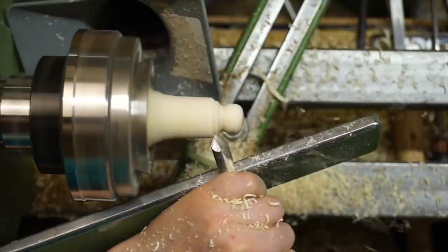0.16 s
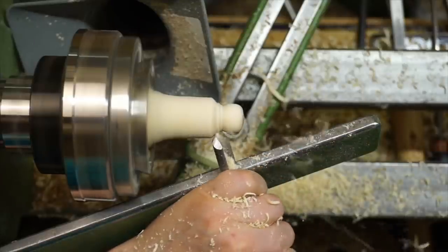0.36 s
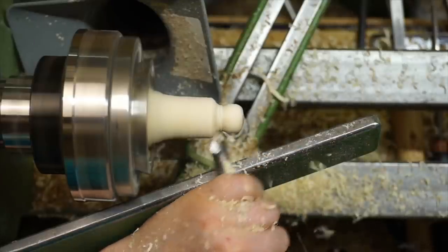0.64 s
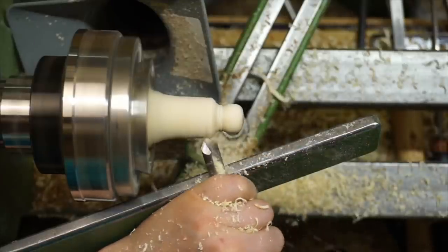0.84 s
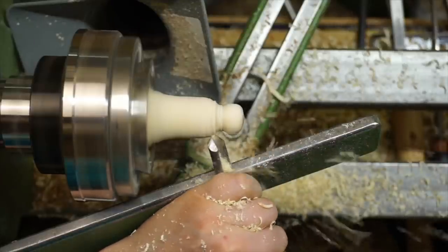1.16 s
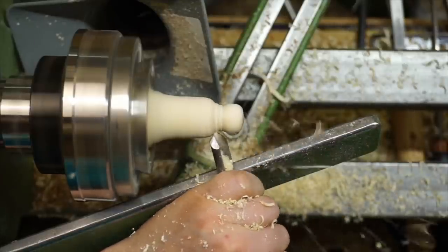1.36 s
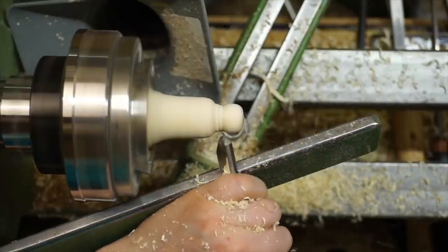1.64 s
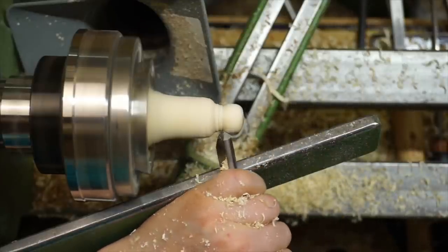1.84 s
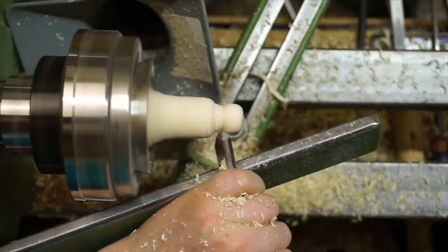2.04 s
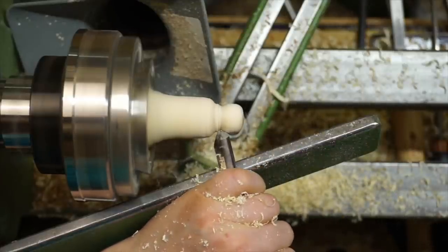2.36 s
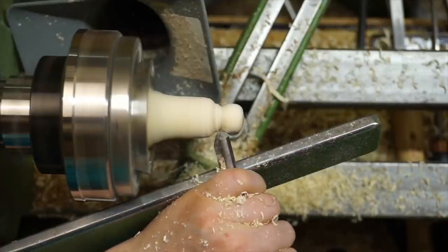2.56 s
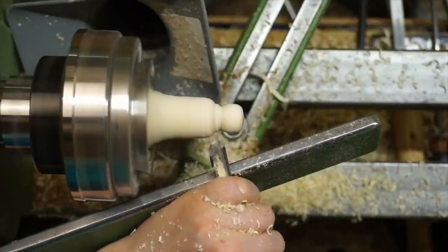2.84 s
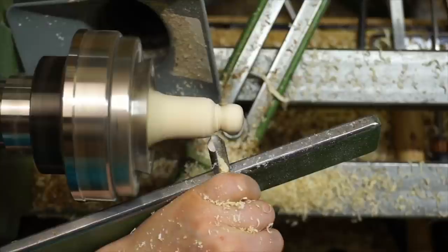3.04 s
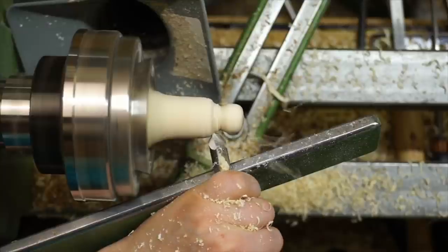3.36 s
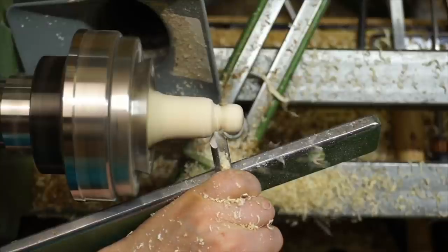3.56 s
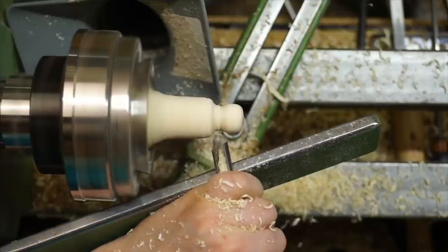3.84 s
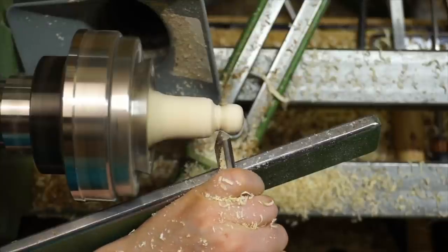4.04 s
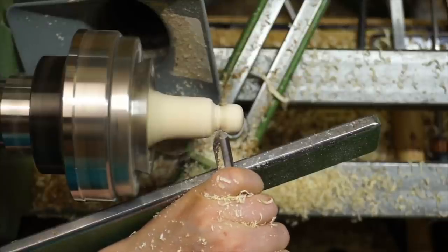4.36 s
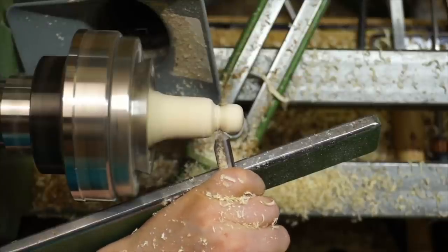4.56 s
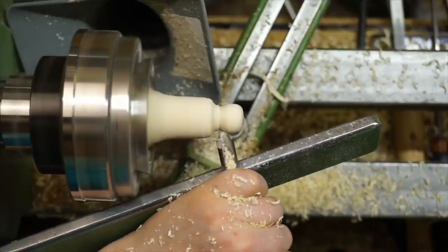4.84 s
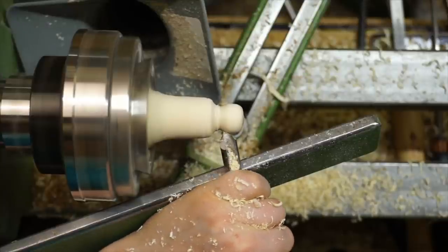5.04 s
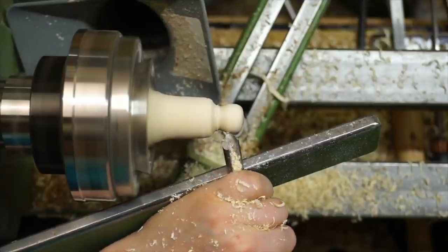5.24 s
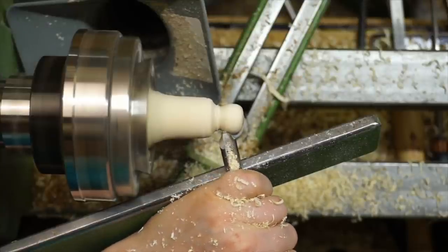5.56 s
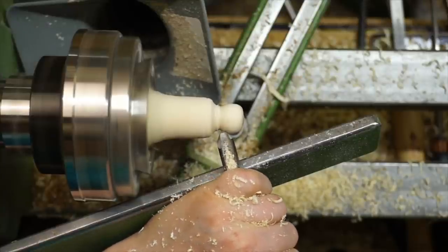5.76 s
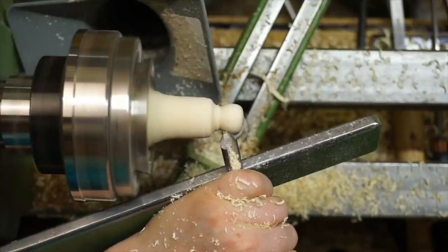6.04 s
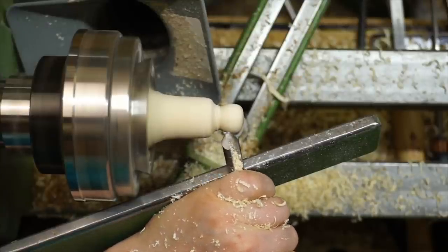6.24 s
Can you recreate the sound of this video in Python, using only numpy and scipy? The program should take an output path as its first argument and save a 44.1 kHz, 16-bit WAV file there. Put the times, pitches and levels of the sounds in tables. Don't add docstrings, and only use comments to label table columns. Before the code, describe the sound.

A lathe hums, whines and rushes throughout in a small workshop. Close to a small, bass-light microphone, a chisel scrapes spinning wood: two raspy, knocking cuts with a quick tap between, three brighter, ringing cuts, then three lighter, thinner skims. Each squeals around a high pitch with fast fluttering chatter, and only the motor is heard in the gaps.

```python
import sys
import numpy as np
from scipy import signal
from scipy.io import wavfile
from scipy.ndimage import uniform_filter1d

SR = 44100
rng = np.random.default_rng(int(sys.argv[2]) if len(sys.argv) > 2 else 0)


def dump(signal):
    limited = np.clip(np.atleast_2d(signal).T, -1, 1)
    pcm = np.round(limited * 32767).astype(np.int16)
    wavfile.write(sys.argv[1], SR, pcm)


def ratio(d):
    e = np.asarray(d, float) / 20
    return 10 ** e


N = 282636
TURN_HZ = 42.38

# bite in seconds, leave in seconds, time to sink in
# in seconds, level while rubbing in dB, where on the turn the blank stands proud from 0 to 1.
EDGE = [
    (-.02, 0.552, .01, -18, 0.47),
    (0.662, .685, .006, -18, .49),
    (0.718, 1.423, 0.082, -9.5, 0.38),
    (1.889, 2.63, 0.014, -22, 0.41),
    (3.064, 3.699, 0.027, -9.5, 0.36),
    (4.136, 4.496, 0.011, -18, .44),
    (4.922, 5.113, 0.011, -8.5, 0.48),
    (5.226, 5.777, 0.012, -25, 0.02),
    (5.928, 6.45, 0.022, -11, 0.03),
]


def evened(x):
    return x / np.sqrt(np.mean(x ** 2) + 1e-20)


def lumpy(x, size):
    return evened(uniform_filter1d(uniform_filter1d(x, size=size), size=size))


def patchy(shape, bins, frames):
    noise = rng.standard_normal(shape)
    return evened(uniform_filter1d(uniform_filter1d(noise, size=bins, axis=0), size=frames, axis=1))


def capped(x, limit):
    swing = np.sqrt(2 * abs(uniform_filter1d(x ** 2, size=37))) / limit + 1e-9
    return x * np.tanh(swing) / swing


def colour_db(points, peaks, hz):
    f, db = np.transpose(points)
    bumps = sum(up_db / (1 + (2 * (hz - at_hz) / width) ** 2) for at_hz, width, up_db in peaks)
    return np.interp(np.log(hz + 1), np.log(f + 1), db) + bumps


def response(db):
    log_gain = np.maximum(db - db.max(), -90) * np.log(10) / 20
    circle = np.concatenate([log_gain, log_gain[-2:0:-1]])
    h = np.fft.ifft(np.exp(np.conj(signal.hilbert(circle)))).real[:len(db) // 2]
    return h / np.linalg.norm(h)


def resonate(x, hz, width):
    turn = np.exp(2j * np.pi * np.cumsum(hz * np.ones(len(x))) / SR)
    r = np.exp(-np.pi * width / SR)
    return np.sqrt(2 * (1 - r * r)) * (turn * signal.lfilter([1], [1, -r], x / turn)).real


def ring(x, hz, width):
    return resonate(resonate(x, hz, width), hz, width) * np.sqrt(2 * np.pi * width / SR)


def add(mix, s, sound):
    part = mix[round(s * SR):][:len(sound)]
    part += sound[:len(part)]


def run(turns):
    count = round(turns)
    return [(k / TURN_HZ, ((2 * k + 1 - count) / count) ** 2) for k in range(count)]


def lathe():
    # pitch in Hz, density in dB per Hz.
    rush = [(65, -90), (110, -46.5), (272, -17.5), (363, -10), (424, -8), (485, -7.5), (934, -4.5),
            (1370, -14.5), (1980, -3.5), (2540, -15.5), (3460, -17.5), (6170, -40.5), (8400, -30.5),
            (11000, -67), (14300, -99), (22000, -120)]
    # pitch in Hz, width in Hz, level above the rush in dB.
    housing = [(172.6, 16, 10.4), (213, 8, 7.7), (277.4, 7.5, 10.8), (342.6, 7.8, 8), (384, 5.8, 4.2),
               (604, 20, 6.6), (678, 15, 6.7), (850.6, 19, 8.2), (884, 40, 2.5), (2051, 93, 11.15),
               (3005, 44, 7.6), (3260, 61, 7.6), (3620, 59, 7.1), (5820, 110, 15), (7200, 42, 3.6),
               (8100, 50, 4.7), (8300, 38, 14), (9000, 45, 5), (9100, 530, 7.3), (2730, 30, 10)]
    # pitch in Hz, width in Hz, level in dB rms.
    whines = [(277.7, 6.7, -64.5), (424.4, 8.3, -56), (927, 18, -53), (1155, 27, -58), (1915, 26, -48.5),
              (1976, 23, -47.5), (2050, 44, -51.5)]
    # start in seconds, length in seconds, pitch in Hz, width in Hz, level in dB rms.
    shudders = [
        (1.075, 0.12, 337, 80, -50),
        (2.533, 0.2, 155, 25, -63.5),
        (3.513, 0.227, 367, 88, -46),
    ]
    rush_db, load_db, load_s, creep_db_per_s = -49, 2.08, 0.39, 0.29
    whine_break_db = 3

    t, hz = np.arange(N) / SR, np.fft.rfftfreq(2048, 1 / SR)
    shape = (len(hz), N // 512 + 5)
    noise = rng.standard_normal(shape) + 1j * rng.standard_normal(shape)
    z = noise * ratio(colour_db(rush, housing, hz)[:, None] + 1.77 * patchy(shape, 10, 10))
    out = evened(signal.istft(z, nperseg=2048, noverlap=1536)[1][:N])
    load = uniform_filter1d(hand()[0], round(load_s * SR))
    out *= ratio(rush_db + load_db * load + creep_db_per_s * t + 4.5)

    broken = lumpy(rng.standard_normal(N), 1500) - 1
    for line_hz, width, db in whines:
        out += ratio(db + whine_break_db * broken) * ring(rng.standard_normal(N), line_hz, width)
    for s, length, low_hz, width, db in shudders:
        swell = np.sin(np.pi * np.clip((t - s) / length, 0, 1))
        rumble = resonate(resonate(rng.standard_normal(N), low_hz, width), low_hz, width)
        out += ratio(db) * swell * evened(rumble)
    return out


def hand():
    # time in seconds, pressure as dB of the song,
    # depth of cut as dB of the blank against the song.
    flat_cuts = [
        [(0, -22.5, -5.5), (.058, -19, 0), (.1, -19.5, -4.5), (.412, -19.5, -5.5), (.546, -21, -4),
         (.576, -21, -13), (.612, -41, -16), (.64, -35, -19)],
        [(.725, -50, -8), (.737, -26.5, -16), (.813, -20.5, -13), (.905, -19.5, -12.5), (1.017, -16, -2.5),
         (1.29, -21, -4.5), (1.453, -20, -18), (1.511, -29, -16), (1.56, -73, -7)],
    ]
    tap = [
        (0.662, -35, -21),
        (0.676, -20.5, -32),
        (0.69, -35, -16),
        (0.71, -53, -14),
    ]
    tipped_cuts = [
        [(1.81, -66, -5), (1.842, -26, -34), (1.884, -35, -10), (1.91, -19, -14.5), (2.12, -22, -16),
         (2.278, -17, -19), (2.428, -22, -16), (2.59, -19.5, -15), (2.69, -46.5, -6)],
        [(2.96, -48, -10), (3.012, -25, -19), (3.058, -28, -12), (3.104, -24, -15.5), (3.376, -25, -15.5),
         (3.428, -16, -21), (3.52, -16.5, -5.5), (3.72, -20, -15.5), (3.77, -54, -14)],
        [(4.05, -70, 4), (4.068, -38.5, -15), (4.126, -38, -9), (4.138, -28, -6), (4.16, -18, -21),
         (4.3, -21, -12), (4.472, -20.5, -6.5), (4.536, -40, -28), (4.57, -70, -3)],
    ]
    skimming_cuts = [
        [(4.81, -83, 12), (4.826, -31.5, -16), (4.912, -47, 1), (4.922, -29, -16), (5.06, -33, -18),
         (5.088, -25, -23), (5.104, -41, 6), (5.112, -35, -7), (5.17, -61, 4)],
        [(5.22, -59, -5), (5.242, -25, -12), (5.39, -22.5, -25), (5.402, -19.5, -35), (5.424, -18, -26),
         (5.712, -29, -15), (5.72, -24, -19), (5.84, -44, -9), (5.85, -38, -11)],
        [(5.89, -47, 1), (5.932, -30.5, -5), (6.108, -27, -18), (6.236, -31.5, -12), (6.246, -13, -47),
         (6.252, -18.5, -29), (6.306, -21.5, -27), (6.346, -18.5, -28), (6.409, -27, -18)],
    ]
    # blade against the song in dB, its growth in dB per second,
    # hiss in dB, its growth in dB per second.
    tearing = [(-5, -9, -48, -2), (-18.5, .1, -64, .1), (-5, -6, -45, -10.5), (-17, 21.5, -55, 6.5),
               (-10, -4, -53, -2), (-8.5, -14.5, -51, -24), (-24.5, 30, -49, 18), (-13, -18, -43.5, -19),
               (-19.5, 15, -47.5, 12)]
    upper_by_cut_db = [-8.5, -2, -7.5, -8, -7, -8.5, -2, -2.5, -2]
    firm_db, usual_depth_db = -22, -4.5
    song_base_hz, sag_hz_per_db, sag_hz_per_depth, rub_rise_hz = 2391, 2, 1.35, 119
    blade_follows, blade_per_depth, rub_upper_db = 0.85, 0.2, 6
    hiss_follows, hiss_knee_db, hiss_dies = 0.44, -42, 0.61
    leave_s, left_blade_db, left_hiss_db = 0.047, -11, -17
    grows_for_s = 0.47

    cuts = [flat_cuts[0], tap, flat_cuts[1], *tipped_cuts, *skimming_cuts]
    t = np.arange(N) / SR
    cut = np.clip(np.searchsorted([rows[0][0] for rows in cuts], t, side="right") - 1, 0, None)
    start, end = np.array([(rows[0][0], rows[-1][0]) for rows in cuts])[cut].T
    touch = uniform_filter1d(1. * (t >= start) * (t <= end), size=300, mode="nearest")
    s, pressure, depth = np.concatenate(cuts).T
    pressure, depth = np.interp(t, s, pressure), np.interp(t, s, depth)

    bite, leave, sink, rub_db = np.array(EDGE)[cut, :4].T
    rubbing = np.clip(1 - (t - bite) / sink, 0, 1)
    left = np.clip((t - leave) / leave_s, 0, 1)
    cutting = np.maximum(t - bite, 0)
    harder, deeper = pressure - firm_db, depth - usual_depth_db

    song_hz = song_base_hz - sag_hz_per_db * np.maximum(harder, -20) - sag_hz_per_depth * deeper
    song_hz += rub_rise_hz * rubbing
    blade_db, blade_grows, hiss_db, hiss_grows = np.array(tearing)[cut].T
    blade_db = (firm_db + blade_follows * harder + blade_db + blade_grows * np.minimum(cutting, grows_for_s)
                + blade_per_depth * deeper + rub_db * rubbing + left_blade_db * left)
    upper_db = blade_db + np.array(upper_by_cut_db)[cut] + rub_upper_db * rubbing
    hiss_db = (hiss_db + hiss_grows * cutting + hiss_follows * harder
               + hiss_dies * np.minimum(pressure - hiss_knee_db, 0) + rub_db * rubbing + left_hiss_db * left)
    song_db, blank_db = pressure - 1.5, pressure + depth + 1.1
    return touch, cut, [song_hz, song_db, blank_db, blade_db, upper_db, hiss_db]


def surface(kept):
    step = round(SR / TURN_HZ)
    fresh = rng.standard_normal((N // step + 1, step))
    wood = fresh.copy()
    for k in range(1, len(wood)):
        share = kept[min(k * step, N - 1)]
        wood[k] = share * wood[k - 1] + np.sqrt(1 - share ** 2) * fresh[k]
    return wood.ravel()[:N]


def bites(cut, kept, uneven_db, throb_db):
    end_grain_turn = .13
    turned = TURN_HZ * np.arange(N) / SR
    lumps = lumpy(surface(np.maximum(kept, .88)), 150)
    end_grain = np.cos(4 * np.pi * (turned - end_grain_turn))
    off_centre = np.cos(2 * np.pi * (turned - np.array(EDGE)[cut, -1]))
    bite_db = uneven_db * lumps + throb_db * (end_grain + 0.52 * off_centre)
    firm = ratio(1.5 * bite_db)
    soft = ratio(1.05 * (bite_db - .3 * throb_db * end_grain) + .7 * lumps)
    return [g / np.sqrt(uniform_filter1d(g ** 2, size=4000)) for g in (firm, soft)]


def rasp(tear, grips, skirt_db, blank_db, blade_db, upper_db, hiss_db):
    # pitch in Hz, density in
    # dB per Hz.
    flat = [
        [(530, -78), (900, -35.5), (1140, -21.5), (1440, -25), (1940, -9), (2410, 1.5), (3000, -10.5), (3750, -9), (5070, -19.5), (6290, -19.5), (7900, -26), (8500, -36), (11000, -80), (18700, -120)],
        [(5000, -45), (8500, -10), (8800, -14), (9300, -3), (11000, -6), (11700, -12), (12800, -8), (13700, -27), (15100, -22), (15800, -25)],
    ]
    tipped = [
        [(530, -52), (900, -43), (1170, -23.5), (1410, -34), (1790, -19), (2410, 0.5), (3000, -13), (3820, -12), (4570, -19), (7670, -29), (8500, -44), (11000, -84), (18700, -120)],
        [(5000, -51), (8500, -29), (8840, -31), (9240, 0), (9730, 6), (12800, -7), (13600, -28), (15000, -6), (15800, -15)],
    ]
    skimming = [
        [(530, -46), (900, -25.5), (1240, -34.5), (1820, -38), (2140, -20.5), (2410, 10.5), (3000, -16), (3720, -21), (4490, -25), (6230, -27), (8500, -35), (11000, -87), (18700, -120)],
        [(5000, -56), (8500, -52), (8700, -46), (9140, -5.5), (9730, 2), (11500, -13.5), (13500, -20), (14600, -19), (15800, -29)],
    ]
    # pitch in Hz, width in Hz, level above the colour in dB.
    rings = [(1161.4, 13.4, 11), (1956, 66, 4.5), (2160, 150, -2.5), (2654, 15, 10.5), (2840, 22, 6),
             (3183, 47, 15.5), (3146, 57, -13), (3640, 30, 11), (3845, 96, 6), (4260, 145, 4.5),
             (4850, 87, 7), (5366, 68, 7.5), (6167, 120, 9.5), (7120, 110, 8), (7650, 280, 8.5),
             (9250, 570, 4.5), (9720, 620, -4), (13000, 160, -3), (13500, 370, -4), (15450, 250, 5)]
    # level, low Hz, high Hz, side of the notch
    bands = [(skirt_db, 2150, 3000, 0), (blank_db, 950, 2150, 0), (blade_db, 3000, 4600, 0),
             (upper_db, 4600, 8500, 0), (hiss_db, 8500, 15800, 1)]
    hz, out = np.fft.rfftfreq(8192, 1 / SR), np.zeros(N)
    for name, colours in (("flat", flat), ("tipped", tipped), ("skimming", skimming)):
        held = grips == name
        for db, low_hz, high_hz, side in bands:
            octaves_out = np.maximum(np.log2(np.maximum(low_hz / (hz + 1), hz / high_hz)), 0)
            h = response(colour_db(colours[side], rings, hz) - 150 * octaves_out)
            out += signal.oaconvolve(tear * ratio(db) * held, h)[:N]
    return out


def shifting(x, patchy_db):
    z = signal.stft(x, nperseg=512)[2]
    return signal.istft(z * evened(ratio(patchy_db * patchy(z.shape, 4, 28))), nperseg=512)[1][:N]


def pings():
    # start in seconds, peak level in dB, pitch in Hz.
    blank_knocks = [(0.0149, -31, 1290), (0.0453, -27, 1170), (0.1037, -31, 1150), (0.1565, -30, 1310),
                    (0.2633, -32, 1320), (0.3676, -25, 1170), (0.4209, -28, 1090), (0.9477, -28, 1170),
                    (1.0031, -25, 1220), (1.0335, -22, 1300), (1.1458, -29, 1090), (1.3114, -31, 1170),
                    (3.5872, -30, 1180), (4.2837, -37, 1180)]
    # start in seconds, number of turns, peak level in dB, pitch in Hz.
    struck = [(.673, 1, -35, 8400), (0.75, 1, -36, 7600), (0.47, 1, -44, 7500), (0.8, 1, -50, 7600),
              (1.851, 2, -23, 2780), (1.9, 4, -22, 2400), (2.014, 1, -33, 3770), (1.9, 2, -28, 3815),
              (2.233, 9, -22, 3830), (2.446, 8, -20.5, 3868), (2.6, 3, -29, 4270), (2.53, 4, -28, 4290),
              (3.101, 8, -37, 7590), (3.289, 7, -36, 7570), (3.112, 2, -42, 7450), (3.099, 5, -50, 9000),
              (3.24, 9.3, -40, 9620), (3.1, 3, -38, 3720), (3.221, 2, -37, 3750), (3.415, 1, -29, 3660),
              (3.447, 1, -30, 3400), (3.506, 3, -21, 3100), (3.61, 1, -25, 3400), (3.46, 5, -19.5, 3190),
              (4.277, 4, -24, 3830), (4.377, 4, -24, 3850), (4.388, 3, -29, 3850), (4.827, 4, -48, 10300),
              (4.919, 1, -48, 10250), (4.94, 6, -37, 9440), (4.968, 8, -45, 10220), (4.92, 1, -41, 4700),
              (4.99, 2, -46, 5700), (4.5, 2, -45, 4100), (5.251, 4, -38.5, 10030), (6.019, 2, -42, 6130),
              (6.089, 8, -38, 5500), (6.042, 10, -44, 4080), (5.997, 1, -46, 6300), (6.042, 3, -44, 5260),
              (6.184, 2, -40, 4850), (5.5, 1, -36, 4400), (6.29, 1, -32, 3420), (6.303, 4, -29, 3780),
              (6.315, 2, -30, 3400), (5.6, 4, -38, 9470), (6.324, 2, -37, 5000), (5.1, 1, -34, 6230),
              (2.245, 8, -28, 3840), (2.434, 9, -27, 3870), (2.642, 2, -33, 3860),
                    (2.655, 2, -36, 3860), (.035, 3, -33, 7800), (.152, 3, -30, 6150), (.36, 2, -31, 6150),
                    (.46, 2, -32, 6150), (.486, 4, -42, 9600), (.345, 3, -44, 11000), (4.07, 1, -56, 10600),
                    (4.185, 3, -42, 9500), (5.565, 2, -45, 9580), (5.676, 3, -45, 10200),
                    (5.946, 2, -46, 10140), (5.958, 1, -44, 9980)]
    knock_rise_s = .008
    ping_s, ping_hz, ends_db, uneven_db = .013, 3793, -3, 4

    out = np.zeros(N)
    knocks = [(s + knock_rise_s, 1, db, hz) for s, db, hz in blank_knocks]
    for s, turns, peak_db, hz in struck + knocks:
        length = ping_s * (ping_hz / hz) ** .6
        t = np.arange(round(length * SR)) / SR
        bump = np.sin(np.pi * (t / length) ** .7) ** 2
        twin_gain = .45 * np.clip(hz / ping_hz - 1, 0, 1)
        for delay, end in run(turns):
            phase, off, size, twin = rng.random(4)
            db = peak_db + ends_db * end - uneven_db * size
            pair = np.sin(2 * np.pi * (hz * (.995 + .01 * off) * t + phase))
            pair += twin_gain * np.sin(2 * np.pi * hz * (.94 + .14 * twin) * t)
            add(out, s - .37 * length + delay, ratio(db) * bump * pair)
    return out


def catches():
    # start in seconds, number of turns, peak level of the song in dB,
    # pitch in Hz.
    hard_spots = [(.2912, 1, -6, 2340), (.6735, 1, -10.5, 2436), (.7337, 1, -14.5, 2390),
                  (.9582, 1, -3, 2430), (1.0041, 1, -5, 2500), (1.483, 1, -9, 2336), (1.935, 1, -5, 2440),
                  (2.068, 1, -4, 2410), (3.1965, 2, -10, 2470), (3.4335, 2, -4.5, 2440),
                  (3.636, 2, -6, 2430), (3.694, 2, -8.5, 2410), (3.709, 1, -6, 2430), (4.4625, 1, -5, 2395),
                  (4.958, 1, -17, 2400), (5.032, 1, -16.5, 2420), (5.052, 1, -19, 2480),
                  (5.7165, 1, -14, 2440), (5.9955, 4, -13.5, 2437), (6.135, 2, -15, 2474),
                  (.3635, 3, -4, 2316), (.4635, 3, -1, 2405), (0.7474, 1, -9.5, 2295), (.826, 3, -6, 2407),
                  (0.9124, 1, -6, 2530), (1.1154, 1, -6, 2260), (1.3593, 1, -4.5, 2360),
                  (1.4292, 1, -3.5, 2426), (1.958, 2, -5, 2493), (2.0535, 1, -8, 2390),
                  (2.2942, 1, -10, 2610), (2.514, 3, -7, 2390), (3.0133, 1, -10.5, 2360),
                  (3.2345, 7, -9.5, 2390), (3.4002, 1, -6.5, 2440), (3.5283, 3, 0, 2424),
                  (4.1496, 1, -11, 2350), (4.2055, 3, -6, 2370), (4.3557, 1, -3, 2410),
                  (4.3938, 1, -7, 2480), (4.8284, 1, -17, 2480), (4.921, 5, -14.5, 2430),
                  (5.0885, 2, -12.5, 2455), (5.2428, 1, -10.5, 2410), (5.276, 3, -7.5, 2450),
                  (5.3955, 1, -9, 2390), (5.4526, 4, -6, 2416), (5.5696, 8, -14, 2438),
                  (6.0888, 2, -9.5, 2550), (6.2779, 6, -3, 2390)]
    catch_s, lead_s = .0105, .002
    ends_db, scatter_hz = -3.5, 36

    chatter, holding = np.zeros(N), np.zeros(N)
    t = np.arange(round(catch_s * SR)) / SR
    bump = np.sin(np.pi * (t / catch_s) ** 0.64) ** 2
    for s, turns, peak_db, hz in hard_spots:
        for delay, end in run(turns):
            phase, off = rng.random(2)
            tone = np.sin(2 * np.pi * ((hz + scatter_hz * (2 * off - 1)) * t + phase))
            add(chatter, s - lead_s + delay, ratio(peak_db - 5 + ends_db * end) * bump * tone)
            add(holding, s - lead_s + delay, bump)
    return chatter, np.minimum(holding, 1)


def chisel():
    # how the edge meets the wood, share of the surface left from the last turn from 0 to 1,
    # unevenness in dB, end-grain throb in dB, skirt of the song in dB, overtone in Hz, overtone against the blade in dB.
    grip = [("flat", 0.32, 0.66, .9, -4.5, 4100, -12), ("flat", 0.53, .86, .6, -30, 2500, -20),
            ("flat", 0.22, 1.2, 0.6, -5.5, 2000, -15), ("tipped", 0.71, 0.71, 1.2, -7, 3850, -16),
            ("tipped", 0.52, 1.45, 1.8, -7, 4100, -9), ("tipped", 0.6, 0.83, 2, -4, 3400, -9.5),
            ("skimming", 0.49, 1.6, 3.2, -8.5, 4200, -17), ("skimming", 0.44, 1.4, 1.1, -13.5, 3300, -4),
            ("skimming", 0.6, 1.5, 1.5, -5.5, 3900, -16)]
    song_width_hz, overtone_width_hz = 233, 85
    song_cap = 3.3
    hush_s, hush = .006, 0.55

    touch, cut, (song_hz, song_db, blank_db, blade_db, upper_db, hiss_db) = hand()
    grips = np.array([row[0] for row in grip])[cut]
    kept, uneven_db, throb_db, skirt_db, over_hz, over_db = np.array([row[1:] for row in grip])[cut].T
    firm, soft = bites(cut, kept, uneven_db, throb_db)
    grain = touch * surface(kept)
    chatter, holding = catches()

    song = ring(firm * grain * ratio(song_db), song_hz, song_width_hz)
    song = capped(song, song_cap * ratio(song_db))
    falter = np.maximum(holding, hush * np.roll(holding, -round(hush_s * SR)))

    tear = soft * grain * ratio(1.26 * holding)
    overtone = ring(tear * ratio(blade_db + over_db), over_hz, overtone_width_hz)
    scrape = rasp(tear, grips, song_db + skirt_db, blank_db, blade_db, upper_db, hiss_db)
    return (1 - .8 * falter) * song + chatter + pings() + overtone + shifting(scrape, patchy_db=2.1)


def shop(x):
    t60_s = 0.12
    t = np.arange(SR // 2) / SR
    taps = rng.choice([-1., 1.], len(t)) * (rng.random(len(t)) < .05) * (t > .004) * ratio(-60 * t / t60_s)
    taps = signal.lfilter([1], [1, -.8], taps)
    return signal.fftconvolve(x, taps / np.linalg.norm(taps))[:N]


def scene():
    no_bass = signal.butter(2, 800, "highpass", fs=SR, output="sos")
    cuts = signal.sosfilt(no_bass, capped(chisel(), .55))
    return (cuts + ratio(-14.5) * shop(cuts) + lathe())[None]


def top_cut(x):
    return signal.sosfilt(signal.butter(12, 16800, fs=SR, output="sos"), x)


def record(dry):
    hiss = ratio(-92) * signal.lfilter([.7], [1, -.3], rng.standard_normal(dry.shape))
    thin = signal.sosfilt(signal.butter(6, 140, "highpass", fs=SR, output="sos"), dry) + hiss
    limited = signal.oaconvolve(thin, signal.firwin(255, 15900, fs=SR)[None], "same")
    return top_cut(limited)


dry = scene()
out = record(dry)
dump(out)
```